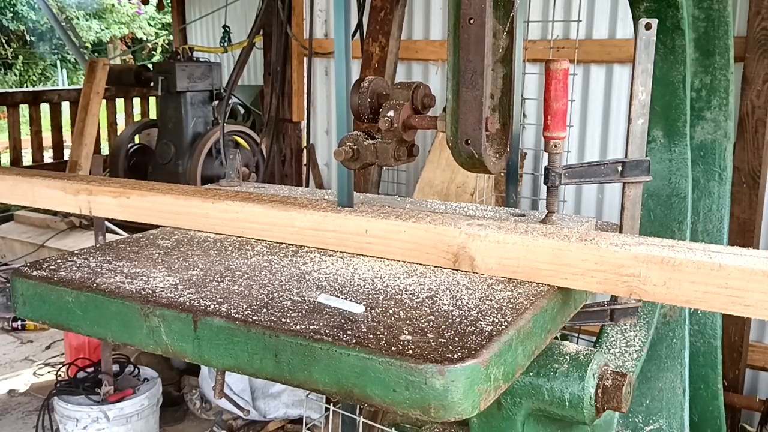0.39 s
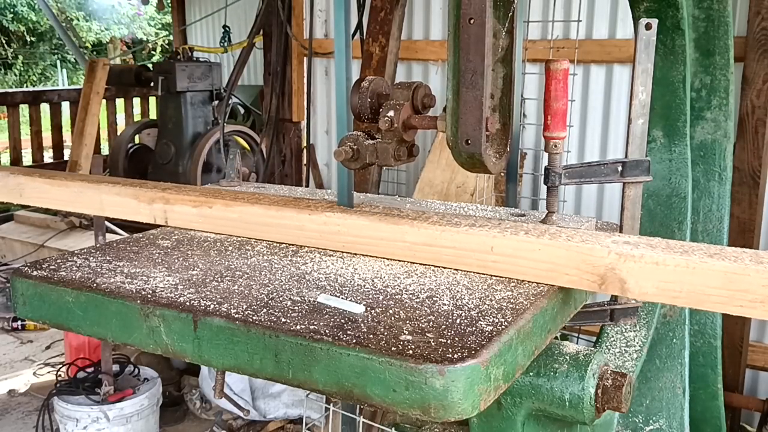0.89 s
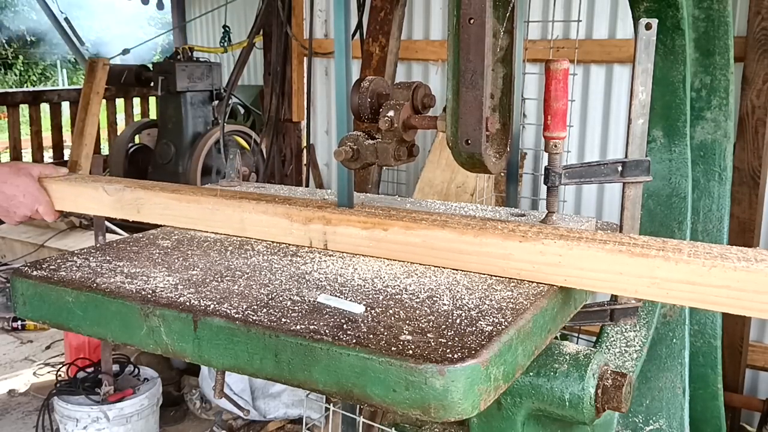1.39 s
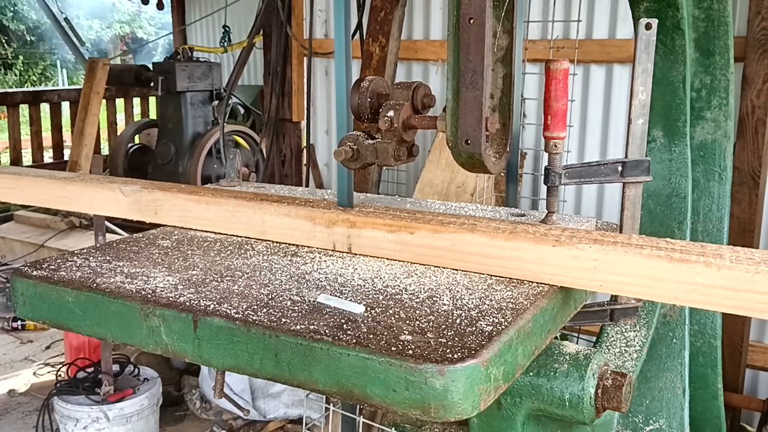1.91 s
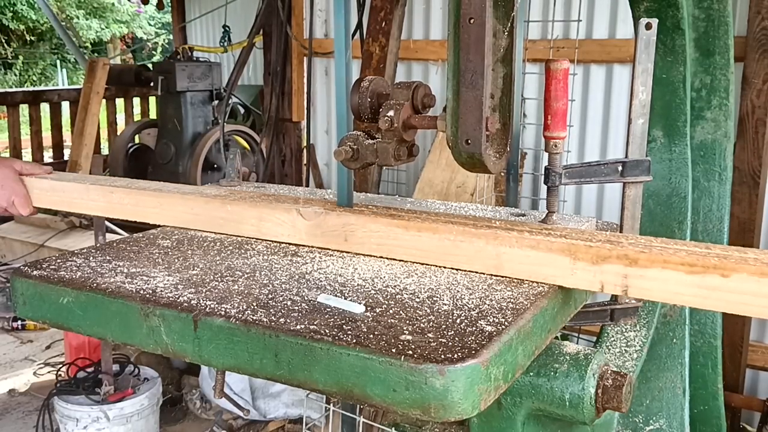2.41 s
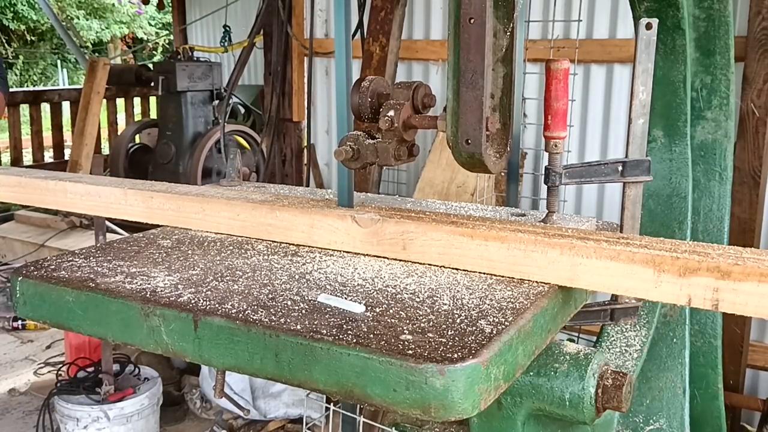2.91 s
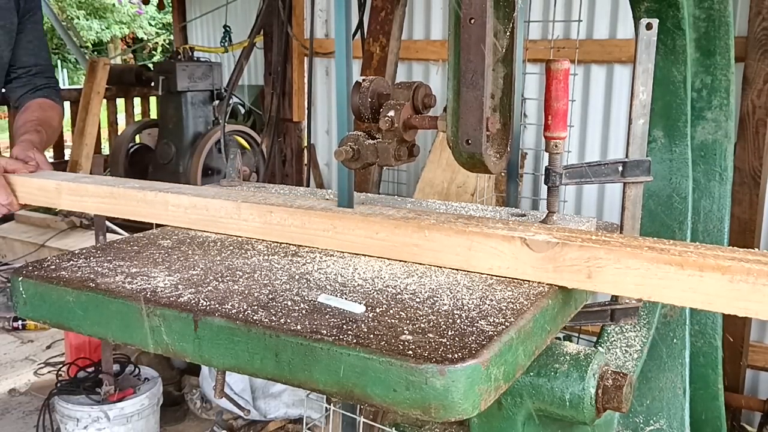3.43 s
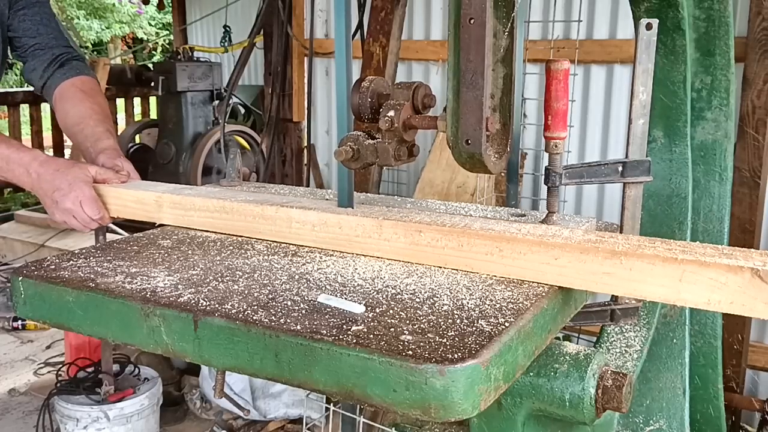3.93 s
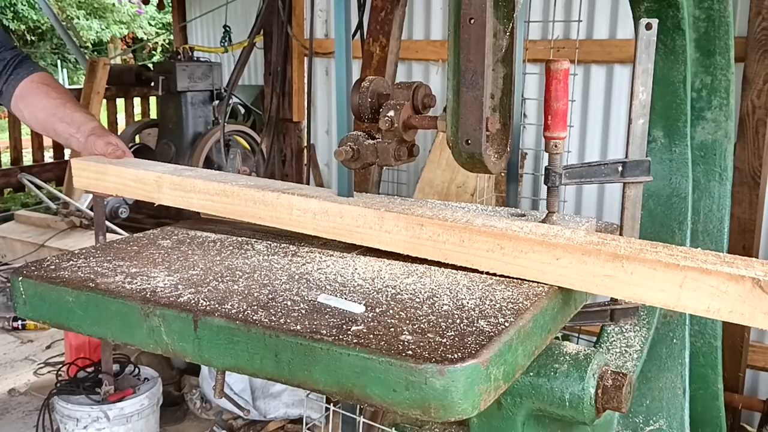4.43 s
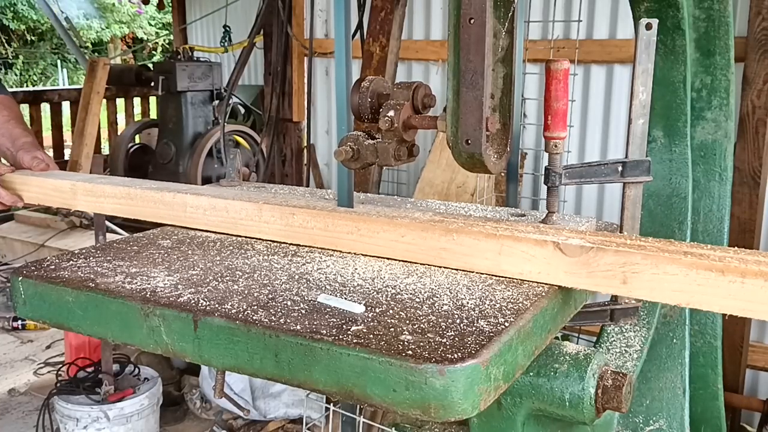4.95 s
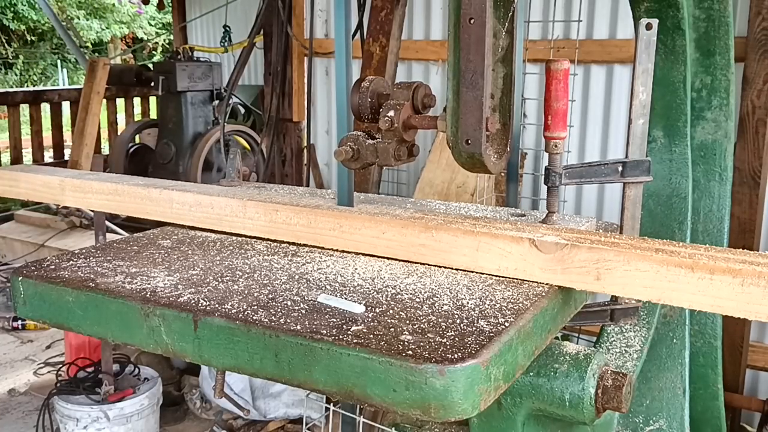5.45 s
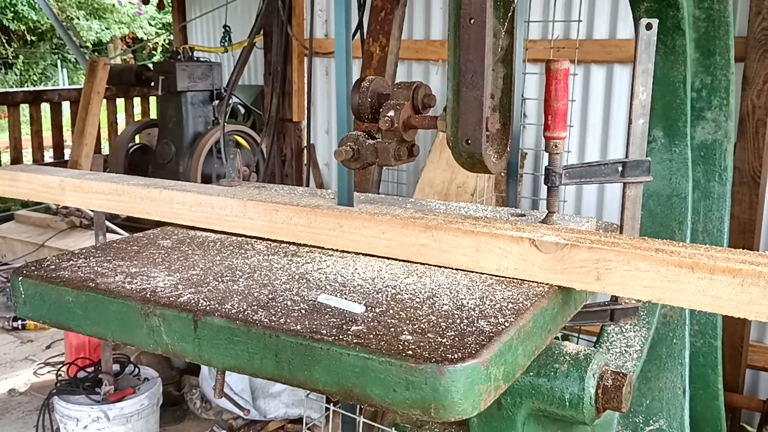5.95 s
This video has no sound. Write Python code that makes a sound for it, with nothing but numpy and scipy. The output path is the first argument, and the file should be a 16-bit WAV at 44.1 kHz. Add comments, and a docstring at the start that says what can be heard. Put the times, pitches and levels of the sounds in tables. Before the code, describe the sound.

A bandsaw is already cutting at the start, its shrill, glassy whine ending near 0.3 s. Machine rumble, loose rattle and blade hiss rise in the gap. The second push, 0.6 to 1.4 s, screams brightly and slides down in pitch; a third, 1.9 to 2.6 s, falls further, with faint narrow ringing hiss after it. Soft low wind puffs touch the microphones between about 2.15 and 3.4 s. The fourth push, 3.1 to 3.9 s, whines and sags again. Then the saw runs free, fuller and louder in rumble, with a fast exhaust beat of nearly seventeen pulses a second. From 4.5 to 5.05 s there are two brief, much weaker whines, roughly steady or slightly rising. Dull bumps of beam on table come around 4.4 to 4.85 and 5.1 to 5.5 s. Hiss, thin ringing and rumble continue to the end, about 6.1 s.

```python
"""The teeth of a belt-driven bandsaw whine as it rips a beam in short pushes, in an open shed, heard at two
microphone ports. Each push loads the belt and the whine, harmonics on a drawn blade speed, mostly glides down.
Narrow noise bands come from rubbed blade and beam, one strengthening the whine. Filtered noise makes the rumble
of engine, wheels and table, louder between pushes, and the blade hiss; pulses through resonances make the fast
exhaust beat, random knocks the rattle. A breeze, low noise separate at each port, brushes the microphones."""
import sys
import numpy as np
from scipy import signal
from scipy.fft import rfft, irfft, next_fast_len
from scipy.io import wavfile
from scipy.ndimage import uniform_filter1d, map_coordinates

SR = 44100
rng = np.random.default_rng(int(sys.argv[2]) if len(sys.argv) > 2 else 0)


def gain_from_db(level_db):
    """Turn a decibel level (scalar or array-like) into a linear amplitude factor."""
    decades = np.asarray(level_db, float) / 20
    return 10 ** decades


def wav_record(signal):
    """Record a signal, one row per channel, as 16-bit PCM in the file named by sys.argv[1]."""
    frames = np.transpose(np.atleast_2d(signal))
    bounded = np.clip(frames, -1, 1)
    # unit amplitude maps onto the largest positive 16-bit level
    quanta = np.round(bounded * 32767).astype(np.int16)
    wavfile.write(sys.argv[1], SR, quanta)


N = 268128  # samples

# Blade speed, as the rate of the three-tooth set pattern: time_s, pattern_rate_hz
BLADE_SPEED = [(0.0, 712.6), (0.26, 709.6), (0.6, 725.2), (0.88, 705.2), (1.15, 687.2), (1.43, 672.6),
               (1.88, 721.2), (2.24, 681.4), (2.48, 650.2), (2.6, 642.7), (3.07, 709.4), (3.21, 699.9),
               (3.62, 651.4), (3.9, 637.0), (4.53, 718.5), (4.67, 726.0), (5.08, 728.6)]
# Pushes of the beam: start_s, end_s, resonance_tuning_at_start_ratio, resonance_tuning_at_end_ratio,
# set_over_tooth_harmonics_db (at 7 kHz), brightness_db_per_octave, tooth_rate_lift_db, rumble_drop_db
PUSHES = [(0.0, 0.273, 1.0027, .9731, -14.5, -2.4, 0, 5.5), (0.6, 1.416, 1.0085, .9978, -15, -.2, -2, 7),
          (1.878, 2.578, .9744, .978, -12.8, -.1, 3.5, 7),
          (3.07, 3.887, 1.0018, .9783, -11.5, -3.4, 0, 6.5),
          (4.511, 4.705, 1.0137, 1.0338, 1, -1.5, 0, 4.5), (4.72, 5.06, 1.0207, .9597, -1.5, -2.1, 0, 3)]
# How hard the teeth bite, relative drive of the tooth harmonics: time_s, level_db
BITE = [(0.0, -31.4), (0.13, -36.5), (0.27, -30.8), (0.6, -32.5), (0.76, -36.2), (0.92, -34.4),
        (1.08, -31.0), (1.24, -31.7), (1.42, -34.1), (1.88, -32.4), (2.02, -31.3), (2.12, -37.3),
        (2.25, -32.7), (2.4, -31.7), (2.58, -33.8), (3.07, -34.0), (3.2, -32.2), (3.35, -31.3),
        (3.5, -30.8), (3.78, -36.0), (3.89, -33.8), (4.51, -46.2), (4.65, -44.8), (4.82, -43.9),
        (4.94, -41.2), (5.06, -49.5)]
# Resonances of blade and beam that the whine glides through: centre_hz, width_hz, level_db
WHINE_RESONANCES = [(1980, 68, -11.0), (2061, 317, -17.5), (4025, 143, -8.4), (4268, 63, 0.1),
                    (5364, 725, 8.1), (5737, 132, 8.6), (5863, 69, 2.4), (6240, 168, 7.5), (6456, 155, 7.0),
                    (7054, 413, 7.1), (7730, 181, 9.4), (7936, 134, 6.7), (8208, 85, -3.8),
                    (8478, 102, 5.6), (8945, 1247, 5.1), (9836, 120, 10.3), (10107, 254, 5.5),
                    (10411, 151, -0.2), (10521, 193, 2.0), (11177, 800, 2.9), (11625, 148, 0.8),
                    (12065, 192, -2.3), (12713, 305, 0.9), (14094, 2165, -11.1)]
# Narrow noise bands of rubbed blade and beam; the 8680 Hz row strengthens the twelfth harmonic of the
# set pattern, a tooth harmonic of the whine: start_s, end_s, start_pitch_hz, end_pitch_hz, width_hz, level_db
NARROW_BANDS = [(1.44, 1.88, 6000, 6000, 260, -35), (1.44, 1.88, 4800, 4750, 220, -36),
                (2.584, 3.085, 6750, 6810, 300, -31), (2.6, 3.08, 4820, 4800, 260, -33.5),
                (4.6, 5.05, 4760, 5190, 120, -37), (4.53, 5.06, 8680, 8790, 130, -37),
                (5.05, 6.2, 9600, 9560, 450, -35.5), (5.03, 6.2, 4750, 4720, 250, -37.5),
                (5.03, 6.2, 6350, 6330, 350, -36), (5.0, 6.2, 5400, 5300, 200, -40),
                (3.92, 4.53, 3900, 3900, 250, -42), (3.92, 4.53, 5520, 5520, 60, -38),
                (0.28, 0.6, 7050, 7050, 130, -38)]
# Rumble of engine, wheels and table, relative spectrum: frequency_hz, density_db_per_hz
RUMBLE_SPECTRUM = [(30, -70), (102, -39), (210, -15.5), (365, -16.5), (457, -3), (790, -3.5), (1400, -6.5),
                   (1990, -7), (2300, -12), (4000, -8.5), (6000, -59)]
# Resonances of cast frame and table, relative: centre_hz, width_hz, level_db
FRAME_RESONANCES = [(466, 13, 1), (592, 24, -3), (1056, 22, -1), (1400, 120, -7), (2040, 80, .5)]
# The beam bumps the table: time_s, level_db (over a median rattle knock)
BUMPS = [(4.43, 7), (4.72, 9), (4.74, 8), (4.85, 8), (5.105, 10), (5.135, 9), (5.265, 10), (5.5, 9)]
# Engine firing rate: time_s, firings_per_s
FIRING_RATE = [(0, 16.68), (1.8, 16.68), (2.2, 16.55), (4.3, 16.55), (4.7, 16.8), (6.08, 16.8)]
# Exhaust pipe resonances, relative: centre_hz, width_hz, level_db
EXHAUST_RESONANCES = [(213.7, 60, 9), (313, 21, 11), (404, 50, 11)]
# Body of the blade hiss, relative spectrum: frequency_hz, density_db_per_hz
HISS_SPECTRUM = [(1500, -21.5), (2500, -5.5), (3500, -9.5), (4200, 1), (6300, 7), (9000, 6.5), (12000, -1)]
# Top of the blade hiss, relative spectrum: frequency_hz, density_db_per_hz
TREBLE_SPECTRUM = [(6000, -64), (9000, -4), (12000, 5), (14200, -0.5), (15700, -19)]
# Blade resonances in the hiss, relative: centre_hz, width_hz, level_db
BLADE_RESONANCES = [(4750, 110, 1), (5750, 60, -2), (6330, 220, 0), (7740, 80, -2), (12230, 90, -1)]
# Top of the hiss over its body: time_s, level_db
TREBLE_LEVEL = [(0, -11.5), (0.6, -3), (1.2, -8), (1.6, -10.5), (2.3, -8), (3.1, -9.5), (3.8, -9),
                (4.3, -5.5), (5.1, -8.5), (5.7, -8), (6.08, -8)]
# Puffs of wind: start_s, end_s, level_db
PUFFS = [(2.152, 2.235, -41.5), (2.26, 2.49, -43.5), (2.56, 3.065, -35.5), (3.28, 3.366, -39)]
# Wind on the ports, relative spectrum: frequency_hz, density_db_per_hz
WIND_SPECTRUM = [(20, -26), (100, -26), (200, -1.5), (300, 2.5), (600, -0.5), (1200, -17), (3000, -36)]
# Likeness of the two ports in rumble and hiss: frequency_hz, correlation_ratio
PORT_LIKENESS = [(60, 0.96), (250, 0.94), (600, 0.98), (1200, 0.92), (2500, 0.5), (6000, 0.39),
                 (13000, 0.26)]
# Balance of the ports: frequency_hz, left_minus_right_db
PORT_BALANCE = [(100, -2), (700, -.5), (2500, 0.5), (8000, -3), (13000, -2)]


def unit(x):
    """Scale to rms 1."""
    return x / np.sqrt(np.mean(x ** 2) + 1e-20)


def along(points, hz):
    """Interpolate (Hz, value) points on a log frequency axis."""
    f, v = np.transpose(points)
    return np.interp(np.log(hz + 1), np.log(f + 1), v)


def curve(points, t):
    """Interpolate (s, value) points in time."""
    s, v = np.transpose(points)
    return np.interp(t, s, v)


def wobble(rate, size=N):
    """A smooth random curve with rate knots a second, at most 190."""
    knots = rng.standard_normal(int(N * 200 / SR))
    return map_coordinates(knots, [np.arange(size) * min(rate, 190) / SR])


def gate(t, start, end, edge):
    """0 outside, 1 inside, with straight ramps of edge seconds centred on both ends."""
    since_start = t - start + (start < .01)  # already open if it starts at zero
    return np.clip(np.minimum(since_start, end - t) / edge + .5, 0, 1)


def filtered(x, response):
    """Shape x by a complex response of frequency."""
    m = next_fast_len(N + SR // 2)
    return irfft(rfft(x, m) * response(np.fft.rfftfreq(m, 1 / SR)), m)[..., :N]


def modes(table, f):
    """Causal response of a set of resonances, summed with alternating sign."""
    total = 0
    for k, (centre, width, db) in enumerate(table):
        total = total + (-1) ** k * gain_from_db(db) * 1j * f * width / (centre ** 2 - f ** 2 + 1j * f * width)
    return total


def rush(spectrum, resonances, ring_db, patchy_db):
    """Stereo noise of rms 1 with resonances standing on it and patches of random gain."""
    z = signal.stft(rng.standard_normal((2, N)), nperseg=512)[2]
    patches = uniform_filter1d(rng.standard_normal(z.shape[1:]), size=6, axis=0)
    patches = uniform_filter1d(patches, size=10, axis=1)
    pair = signal.istft(z * gain_from_db(patchy_db * unit(patches)), nperseg=512)[1][:, :N]

    def mid_side_colour(hz):
        colour = gain_from_db(along(spectrum, hz)) * (1 + gain_from_db(ring_db) * abs(modes(resonances, hz)))
        angle = np.arccos(np.clip(along(PORT_LIKENESS, hz), -1, 1)) / 2
        return colour * [np.cos(angle), np.sin(angle)]

    mid, side = filtered(pair, mid_side_colour)
    return unit(np.array([mid + side, mid - side]))


def whine():
    """Teeth strike three times per set pattern; unequal left, right and raker teeth add harmonics between.
    Each swells as it glides through a resonance; the resonances retune as the beam moves on."""
    whine_db, set_roll_db_per_octave, unsteady_db = 1, 2.6, 1.4
    out = np.zeros((2, N))
    for start, end, tuned_from, tuned_to, set_db, tilt_db, tooth_rate_db, _ in PUSHES:
        a, b = round(start * SR), round(end * SR)
        size = b - a
        t = np.arange(a, b) / SR
        rate, bite_db = curve(BLADE_SPEED, t), curve(BITE, t)
        tuning = np.linspace(tuned_from, tuned_to, size)
        phase = 2 * np.pi * np.cumsum(rate * (1 + 0.00033 * wobble(18, size))) / SR
        since_start = t - t[0] + (a == 0)  # the first push is already under way
        envelope = np.clip(np.minimum(since_start, t[-1] - t) / 0.022, 0, 1)
        for k in range(3, 22):
            hz = k * rate
            octaves = np.log2(hz / 7000)
            is_set = k % 3 != 0
            drive_db = bite_db + whine_db + tilt_db * octaves
            if k == 3:
                drive_db = drive_db + tooth_rate_db
            if is_set:
                drive_db = drive_db + set_db + set_roll_db_per_octave * octaves
            power = 0
            for centre, width, db in WHINE_RESONANCES:
                power = power + (gain_from_db(db) / (1 + (2 * (hz / tuning - centre) / width) ** 2)) ** 2
            gain = gain_from_db(drive_db) * np.sqrt(power)
            # uneven teeth and grain
            waver_db = unsteady_db * (2 if is_set else 1) * (wobble(22, size) + .5 * wobble(9, size))
            flutter = unit(gain_from_db(waver_db + 3 * wobble(120, size)))
            lag = .42 * wobble(5.5, size)  # rad; shed reflections shift each harmonic between the ports
            blur = .45 * wobble(90, size)  # rad; the blade flexes, so each line smears a little
            tone = np.sin(k * phase + blur + rng.uniform(0, 2 * np.pi) + [lag, -lag])
            out[:, a:b] += np.sqrt(2) * envelope * gain * flutter * tone
    return out


def narrow_bands():
    """Rubbed blade and beam, and one whine harmonic: low noise shifted up to a steady or gliding pitch."""
    t, out = np.arange(N) / SR, 0
    for start, end, from_hz, to_hz, width, db in NARROW_BANDS:
        phase = 2 * np.pi * np.cumsum(np.interp(t, [start, end], [from_hz, to_hz])) / SR
        p, q = filtered(rng.standard_normal((2, N)), lambda f: 1 / (1 + 1.3j * f / width) ** 2)
        band = unit(p * np.cos(phase) + q * np.sin(phase))
        flutter = unit(gain_from_db(2 * wobble(14) + 2 * wobble(70)))
        envelope = np.clip(np.minimum(t - start, end - t) / 0.025, 0, 1)
        out = out + gain_from_db(db) * envelope * band * flutter
    return out


def frame_noise():
    """Broad noise coloured by the resonances of cast frame and table."""
    return rush(RUMBLE_SPECTRUM, FRAME_RESONANCES, ring_db=2.5, patchy_db=.9)


def rumble(turns):
    """Engine, wheels and table: frame noise that throbs once per firing."""
    throb_db = .8 * np.cos(2 * np.pi * turns) + 1.1 * wobble(60) + 1.1 * wobble(45)
    return unit(gain_from_db(throb_db) * frame_noise())


def rattle():
    """Loose parts knock on the frame at random and the beam bumps the table: short bursts of frame noise."""
    knocks_per_s, fade_s = 40, .004
    knocks = (rng.random(N) < knocks_per_s / SR) * gain_from_db(3 * rng.standard_normal(N))
    bumps = np.zeros(N)
    for s, db in BUMPS:
        bumps[round(s * SR)] = gain_from_db(db)
    bursts = filtered(knocks + bumps, lambda f: 1 / (1 + (2 * np.pi * f * fade_s) ** 2))
    # small parts carry no bass, wood no treble
    return unit(filtered(bursts * frame_noise(),
                         lambda f: (1j * f / (300 + 1j * f)) ** 4 / (1 + (f / 1900) ** 4)))


def exhaust(turns):
    """Each firing sends a pulse of uneven strength through the pipe resonances."""
    fired = np.diff(np.floor(turns), prepend=-1) * gain_from_db(1.5 * wobble(17))
    return unit(filtered(fired, lambda f: modes(EXHAUST_RESONANCES, f) ** 2 * (1j * f / (150 + 1j * f)) ** 2))


def hiss(t):
    """The blade hisses in kerf and guides: chattering noise with a separately drawn treble."""
    body = rush(HISS_SPECTRUM, BLADE_RESONANCES, ring_db=-1.5, patchy_db=.9)
    top = rush(TREBLE_SPECTRUM, BLADE_RESONANCES, ring_db=-2.5, patchy_db=.6)
    body_chatter_db = 1.1 * wobble(12) + 1.1 * wobble(40)
    top_chatter_db = 1.6 * (1.1 * wobble(12) + 1.1 * wobble(40))
    return gain_from_db(body_chatter_db) * body + gain_from_db(top_chatter_db + curve(TREBLE_LEVEL, t)) * top


def machine():
    """Rumble, rattle, exhaust and hiss, all sinking during each push, the hiss less."""
    rumble_db, hiss_db = -30, -24.5  # running free
    rattle_db, exhaust_db = -8.5, -16  # against the rumble
    hiss_share, sink_s, first_firing_s = 0.38, .08, .036
    t = np.arange(N) / SR
    sunk_db = sum(drop_db * gate(t, start, end, sink_s) for start, end, *_, drop_db in PUSHES)
    turns = np.cumsum(curve(FIRING_RATE, t)) / SR - first_firing_s * FIRING_RATE[0][1]  # in firings
    engine = rumble(turns) + gain_from_db(rattle_db) * rattle() + gain_from_db(exhaust_db) * exhaust(turns)
    engine_gain = gain_from_db(rumble_db - sunk_db + .8 * wobble(6))
    return engine_gain * engine + gain_from_db(hiss_db - hiss_share * sunk_db) * hiss(t)


def breeze():
    """Puffs of lumpy low noise, unrelated from port to port, over a faint steady stir of air."""
    air_db, air_top_hz, puff_edge_s = -76, 131, .045
    t = np.arange(N) / SR
    noise = filtered(rng.standard_normal((2, N)), lambda hz: gain_from_db(along(WIND_SPECTRUM, hz)))
    lumps = gain_from_db(0.46 * np.array([wobble(3.2), wobble(26.7)]))  # one curve per port
    puff_gain = sum(gain_from_db(db) * gate(t, start, end, puff_edge_s) for start, end, db in PUFFS)
    stir = rng.standard_normal(N) + .8 * rng.standard_normal((2, N))  # partly shared by the ports
    air = unit(filtered(stir, lambda f: 1 / (1 + (f / air_top_hz) ** 4)))
    return puff_gain * unit(lumps * noise) + gain_from_db(air_db) * air


def scene():
    """Saw, beam, engine and wind together in the shed."""
    return whine() + narrow_bands() + machine() + breeze()


def roll_off(x):
    """The treble ends steeply here."""
    return signal.sosfilt(signal.butter(12, 16800, fs=SR, output="sos"), x)


def record(dry):
    """The two ports differ a little in level with frequency, mostly to the right; the band ends at top_hz."""
    top_hz = 15720

    def port_response(hz):
        return gain_from_db(np.outer([.5, -.5], along(PORT_BALANCE, hz))) * (hz < top_hz)

    return roll_off(filtered(dry, port_response))


dry = scene()
out = record(dry)
wav_record(out)
```